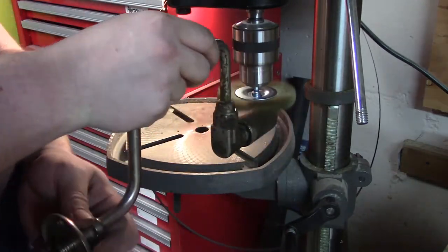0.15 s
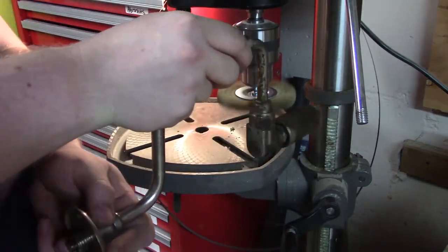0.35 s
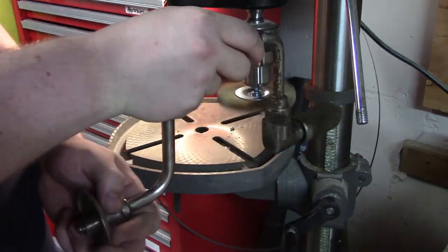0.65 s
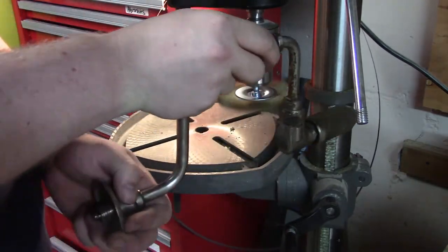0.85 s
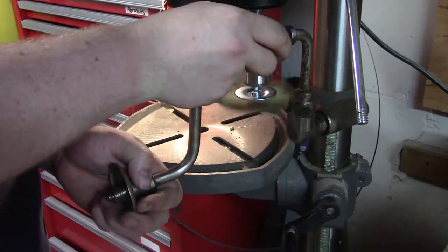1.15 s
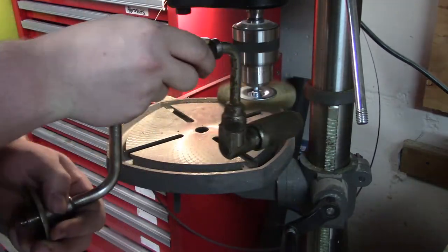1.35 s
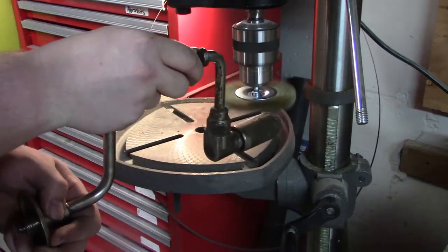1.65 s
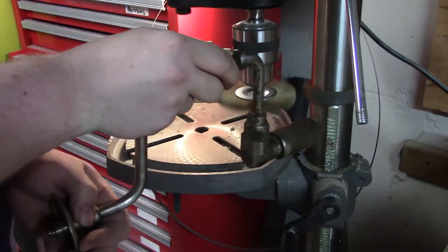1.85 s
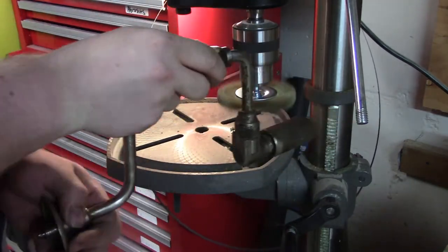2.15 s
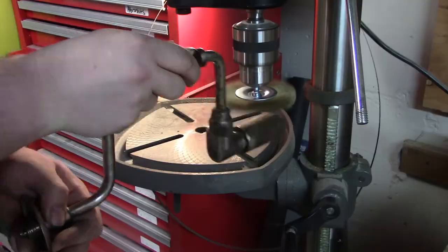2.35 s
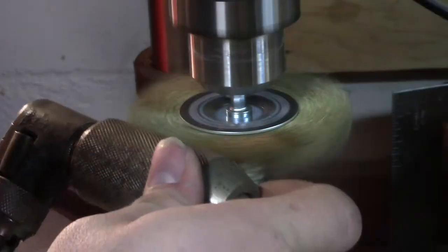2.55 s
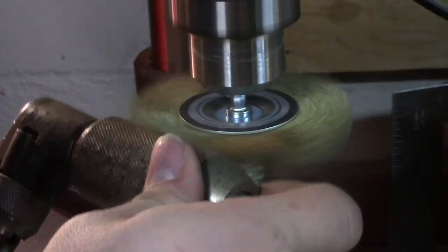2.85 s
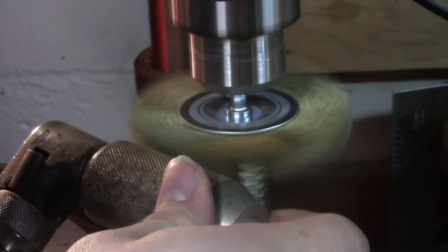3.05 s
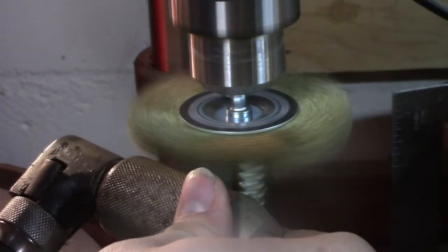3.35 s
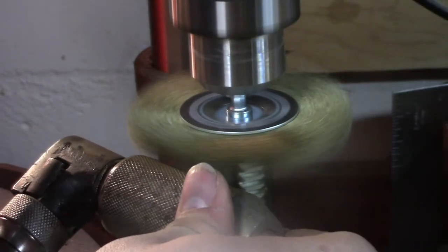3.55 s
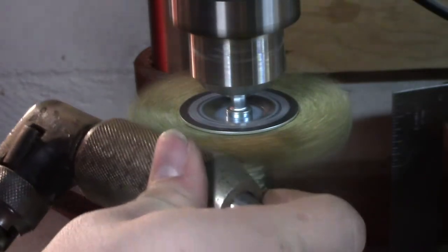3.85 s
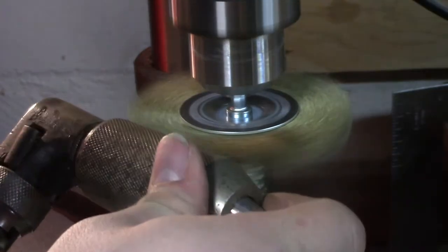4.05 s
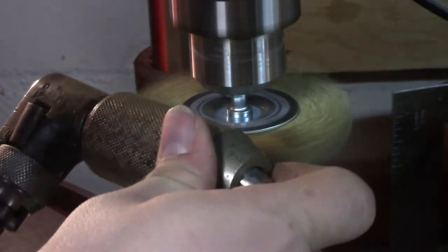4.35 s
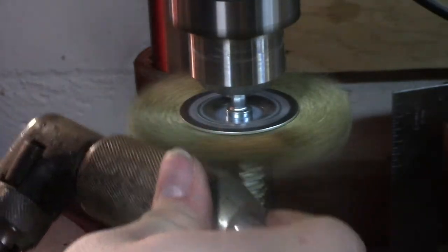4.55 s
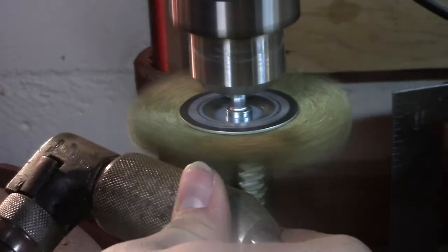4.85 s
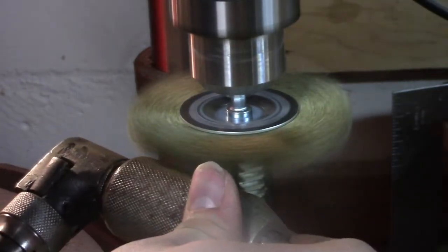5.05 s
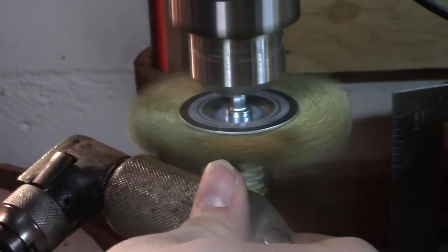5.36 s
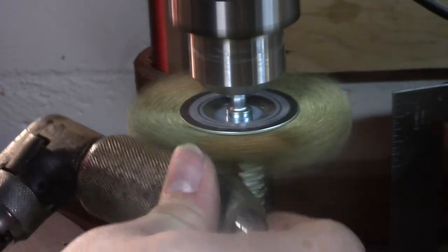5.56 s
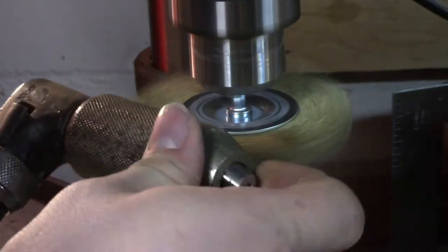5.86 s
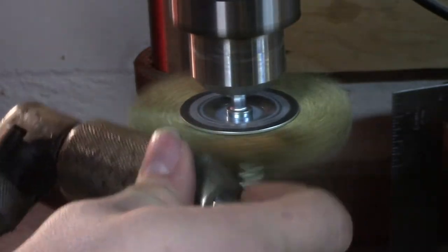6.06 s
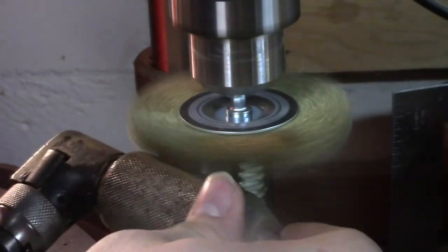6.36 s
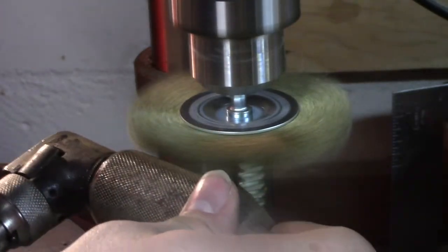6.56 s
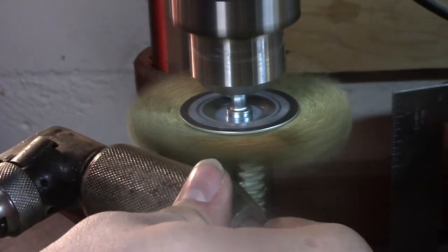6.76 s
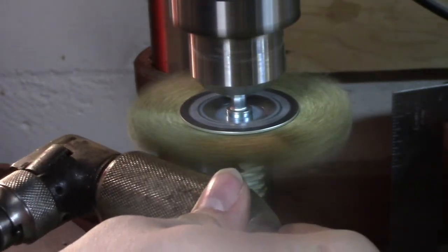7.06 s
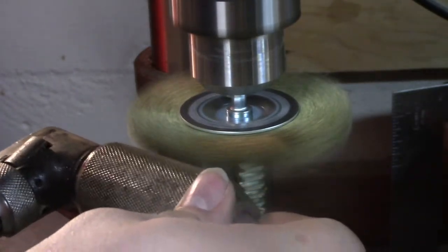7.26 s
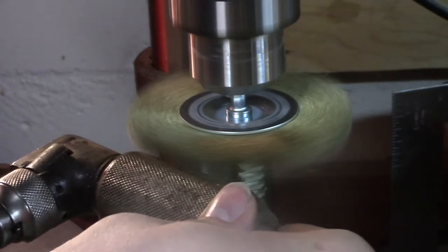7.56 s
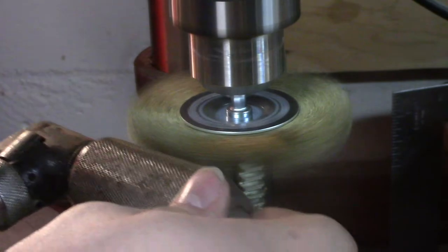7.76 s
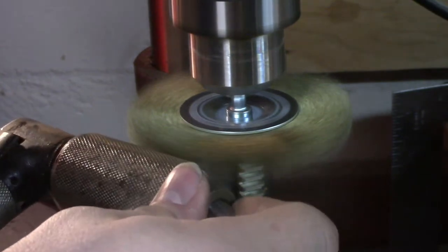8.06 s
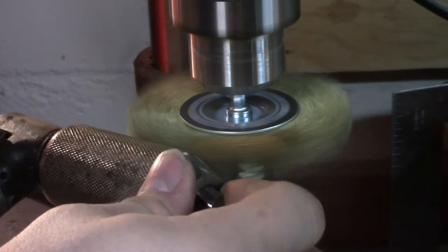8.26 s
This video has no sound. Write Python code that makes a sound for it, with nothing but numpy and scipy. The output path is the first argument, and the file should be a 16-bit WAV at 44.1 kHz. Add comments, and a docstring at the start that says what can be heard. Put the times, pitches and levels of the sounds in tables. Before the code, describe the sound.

A spinning brush wheel on a drill press scrubs a steel tool, first as a fast buzzing rasp, then a closer, slower, knocking chatter.

```python
"""In a workshop, a steel tool is pressed against a brush wheel spinning in a drill press.
The motor and belt rumble and hum. The bristles chatter on the tool once a turn, catch on its edges
and hiss as they slide off. First we hear it from farther away and sped up, so pitch and rhythm
are raised. Then we jump close by, at true speed: the tool also knocks, and at last faintly squeals."""
import sys
import numpy as np
from scipy import signal
from scipy.fft import rfft, irfft, next_fast_len
from scipy.io import wavfile
from scipy.ndimage import map_coordinates

SR = 44100
rng = np.random.default_rng(int(sys.argv[2]) if len(sys.argv) > 2 else 0)


def transcribe(u):
    """Save the signal u as a 16-bit wav file named by the first command-line argument.

    u: samples, shape (n,) or (channels, n), limited to [-1, 1]; the rate is SR.
    q: integer samples, one column per channel.
    """
    v = np.clip(np.atleast_2d(u).T, -1, 1)
    q = np.round(v * 32767).astype(np.int16)
    wavfile.write(sys.argv[1], SR, q)


N = 370440
T = np.arange(N) / SR

CUT_S, FAST = 2.506, 4.822  # when the close scene begins; how many times faster the far one runs
SPINDLE_HZ = 31.965  # turns of the wheel a second, at true speed

# The tone colour far off and close by. Each row: frequency at true speed in Hz, boost in dB.
FAR_COLOUR = [(30, -15), (100, -4.5), (150, -2), (450, -6.5), (1000, 0), (1400, -0.5), (1700, 0.5),
              (2300, -3.5), (3200, -6.5)]
CLOSE_COLOUR = [(30, -0.77), (340, -1.2), (550, -0.65), (850, -0.23), (1400, 0.22), (1530, -0.49),
                (2000, -0.42), (5000, -0.049), (15800, -0.65)]
# Notes at which press, table and tool ring close by. Each row: pitch in Hz, width in Hz, boost in dB.
CLOSE_RINGS = [(151.6, 9, 11), (175, 14, 1.5), (226, 19, 6), (342, 18, -4), (391, 30, 10.5),
               (444, 39, 13.5), (501, 18, 2), (548, 20, -1.5), (613, 59, 3.5), (662, 19, 5.5), (695, 27, 3),
               (790, 28, 2.5), (830, 14, -3), (907.5, 33, 12), (950, 18, -1.5), (1002, 47, 11),
               (1120, 32, 5), (1310, 40, 3), (1450, 40, 8.5), (1520, 50, -3), (1610, 43, 3.5),
               (1775, 32, 3.5), (2220, 140, -2.5), (2402, 68, 7), (2535, 56, 7.5), (2850, 200, 3.5),
               (3090, 90, -4.5), (3200, 51, 4.2), (3606, 110, 7.5), (3830, 180, 8), (4003, 33, 6),
               (4200, 120, -2), (4361, 220, 3), (4760, 280, 3.5), (5230, 250, -2)]


def amp(db):
    """Turn decibels into a factor to multiply by."""
    return 10 ** (np.asarray(db) / 20)


def unit(x):
    """Scale x to an average (rms) level of 1."""
    return x / np.sqrt(np.mean(x ** 2) + 1e-20)


def along(points, hz):
    """Read a curve of (Hz, value) points at hz, with octaves evenly spaced."""
    frequencies, values = np.transpose(points)
    return np.interp(np.log(hz + 1), np.log(frequencies + 1), values)


def wobble(rate):
    """A smooth random curve that heads for a new value rate times a second."""
    return map_coordinates(rng.standard_normal(N // 8), [T * rate], mode="wrap")


def coloured(x, gain_db):
    """Shape the tone of x by a curve of dB against frequency; white noise would keep its level."""
    size = 16384
    cepstrum = irfft(np.log(amp(gain_db(np.fft.rfftfreq(size, 1 / SR))) + 1e-7))
    cepstrum[1:size // 2] *= 2  # folded so that the filter rings only after a sound, never before
    cepstrum[size // 2 + 1:] = 0
    kernel = irfft(np.exp(rfft(cepstrum)))
    return signal.fftconvolve(x, kernel / np.linalg.norm(kernel))[:N]


def through_press(force, spectrum, speed, detune=0):
    """A force makes machine and tool ring; detune shifts the tool's own notes, those above 2200 Hz."""
    # Sped up, with the tool held upright, everything rings higher.
    # Each row: pitch as heard in Hz, width in Hz, boost in dB.
    far_rings = [(732, 48, 10.5), (990, 41, 5), (1224, 93, 3), (1394, 14, 4), (1640, 50, -3),
                 (1800, 164, 6), (1973, 180, 6.5), (2170, 114, 10), (2440, 85, 7), (2890, 45, 7),
                 (3177, 140, 9), (3446, 124, 8.5), (3697, 88, -2), (4190, 70, 2), (4300, 60, -4),
                 (4410, 114, 12.5), (4530, 170, 4.5), (4750, 90, 5), (4910, 140, 4.5), (5090, 120, 7.5),
                 (5190, 70, 2), (5460, 69, 8), (5795, 420, -4), (6800, 160, 6.5), (8000, 100, -7),
                 (8800, 440, 4.5), (9420, 260, 6.5), (12000, 700, 4.5), (15100, 500, 5)]
    rings, colour = (CLOSE_RINGS, CLOSE_COLOUR) if speed == 1 else (far_rings, FAR_COLOUR)
    rings = [(hz * (1 + detune * (hz > 2200)), width, db) for hz, width, db in rings]
    boost = lambda f: sum(db / (1 + (2 * (f - hz) / width) ** 2) for hz, width, db in rings)
    return coloured(force, lambda f: along(spectrum, f / speed) + along(colour, f / speed) + boost(f))


def strikes(rate, spread_db):
    """Countless tiny hits blur into noise, in uneven bunches that come rate times a second."""
    return unit(rng.standard_normal(N) * amp(spread_db * wobble(rate)))


def drive(speed):
    """Belt and bearings shake the frame in uneven lumps; motor and pulleys hum almost steadily."""
    # The tone of the rumble. Each row: frequency at true speed in Hz, level in dB.
    spectrum = [(30, -26.5), (100, -26), (130, -19), (165, -9), (260, 0.5), (350, -8.5), (500, -9),
                (800, -23), (1500, -40.5)]
    # The humming notes. Each row: pitch at true speed in Hz, level close by in dB, level far off in dB.
    notes = [(86.6, -34, -30), (120.4, -28, -20.5), (128.8, -35, -25.5), (151.8, -14.5, -10),
             (159.4, -37, -17.5), (177, -22, -24), (225, -17.5, -24), (253.5, -25, -11)]
    lumps = unit(amp(1.6 * wobble(40 * speed)))
    rumble = through_press(strikes(90 * speed, spread_db=0.5) * lumps, spectrum, speed)
    hum = np.zeros(N)
    for hz, close_db, far_db in notes:
        db = close_db + along(CLOSE_COLOUR, hz) if speed == 1 else far_db + along(FAR_COLOUR, hz)
        hum += amp(db) * np.sin(2 * np.pi * hz * speed * T + 0.5 * wobble(5))
    return rumble + hum


def held(start, end, speed):
    """One press of the hand, from 0 to 1 and back: lean in, hold, ease off."""
    ramp_s = 0.13 / speed
    lean = np.clip(.5 + (T - start) / ramp_s, 0, 1)
    ease = np.clip(.5 + (end - T) / ramp_s, 0, 1)
    return lean * ease


def handwork(presses, graze, speed):
    """Turn the presses into smooth curves; between presses the bristles only graze the tool."""
    table = np.array(presses)
    holds = np.array([held(start, end, speed) for start, end in table[:, :2]])
    rest = np.array(graze)[:, None]
    return rest + (table[:, 2:].T - rest) @ holds / np.maximum(holds.sum(axis=0), 1)


def wheel_grip(turn_shape, speed, start_turn):
    """The off-centre wheel grips and eases once a turn; the hand gives way, so each turn differs."""
    part, db = np.transpose(turn_shape)
    turns = SPINDLE_HZ * speed * T + start_turn + .06 * wobble(SPINDLE_HZ * speed / 2)
    bite_db = 1.7 * np.clip(rng.standard_normal(N // 20), -2, 2)[turns.astype(int)]
    return unit(amp(np.interp(turns, part, db, period=1) + bite_db * np.sin(np.pi * (turns % 1))))


def chug(speed):
    """The grip surges as the belt's joint comes round and the tool rocks in the hand."""
    # Each row, at true speed: surges a second, time of one surge in seconds, swing in dB.
    surges = [(9.95, .026, .95), (11.64, .038, .55)]
    return unit(amp(sum(db * np.cos(2 * np.pi * hz * (speed * T - s)) for hz, s, db in surges)))


def chatter(force, speed, detune=0):
    """Bristles beat on the steel and set tool and press ringing."""
    # The tone of the beating. Each row: frequency at true speed in Hz, level in dB.
    spectrum = [(250, -33.5), (620, 0), (1000, -4), (1400, -7.5), (1520, -13), (2500, -14), (3700, -11),
                (5300, -21.5), (9000, -25), (15800, -38)]
    return through_press(force, spectrum, speed, detune)


def sizzle(grip):
    """The sped-up hiss flickers as fine bristles touch and leave the moving tool."""
    # Each row: frequency in Hz, level in dB.
    spectrum = [(4500, -30), (6900, 0), (7700, 2), (8150, -5), (8500, 3), (9400, 5), (10600, -4),
                (11400, 2), (12600, 3), (13800, -3), (15000, -1), (15800, -5)]
    flicker = unit(amp(2.1 * wobble(42)))
    return coloured(strikes(1400, spread_db=3.0) * grip ** 0.16 * flicker, lambda f: along(spectrum, f))


def workshop(x, speed, fade_s, echo_db):
    """Nearby walls and cabinets add a short echo that falls 60 dB in fade_s at true speed."""
    t = T[:SR // 2]
    tail = rng.standard_normal(len(t)) * amp(-60 * t * speed / fade_s) * (t * speed > .004)
    return x + amp(echo_db) * signal.fftconvolve(x, tail / np.linalg.norm(tail))[:N]


def catches(rows, speed, rise_s, decay_s):
    """A tuft snags on an edge of the tool, tightens quickly and rakes over it in a short burst."""
    # The tone of the raking. Each row: frequency at true speed in Hz, level in dB.
    spectrum = [(200, -38), (600, 0.5), (1000, 5.5), (1400, -0.5), (1600, -2.5), (2600, -5), (3800, -7),
                (5500, -15), (9000, -18), (15800, -29)]
    age = np.maximum(T[:SR // 5] - rise_s / 2, 0)
    burst = (1 - np.exp(-age / rise_s)) * np.exp(-age / decay_s)
    force = np.zeros(N)
    for s, db in rows:
        first = max(round((s - rise_s) * SR), 0)
        force[first:first + len(burst)] += amp(db) * burst[:N - first]
    return through_press(force * rng.standard_normal(N), spectrum, speed)


def far_brushing():
    """Sped up, the turns merge into a buzz and the chatter becomes a bright rasp."""
    # The hand leans in. Each row: start and end in seconds, chatter level in dB, hiss level in dB.
    presses = [(0.14, 0.33, -36.5, -50), (0.33, 0.38, -37.5, -44), (0.38, 0.71, -37, -50),
               (0.71, 0.87, -36, -46), (0.87, 1.05, -35.8, -50), (1.07, 1.47, -35.5, -48),
               (1.48, 1.78, -36.5, -48), (1.78, 1.86, -35.5, -43), (1.86, 1.97, -37.8, -48.5),
               (1.97, 2.04, -34.5, -50), (2.05, 2.23, -36.5, -49), (2.23, 2.41, -36, -43)]
    # One turn of the wheel. Each row: place in the turn from 0 to 1, grip in dB.
    turn_shape = [(0, -6.5), (.13, 0), (.23, 5.5), (.42, 1.5), (.7, -3), (.9, -5.5)]
    # Tufts that catch. Each row: time in seconds, relative strength in dB.
    tufts = [(0.193, -21), (0.3462, -17.5), (0.7877, -20), (0.8326, -19), (1.098, -20), (1.281, -21),
             (1.728, -16), (1.8058, -19), (1.834, -21.5), (2.001, -19), (2.232, -22), (2.252, -17),
             (2.376, -21), (2.4035, -17.5)]
    graze_db = -38.5
    chatter_db, hiss_db = handwork(presses, (graze_db, -54.5), FAST)
    grip = wheel_grip(turn_shape, FAST, start_turn=0.57)
    rasp = chatter(strikes(1500, spread_db=1.5) * grip * chug(FAST) ** 0.8 * amp(chatter_db), FAST)
    snags = amp(-7.5) * catches(tufts, FAST, rise_s=.002, decay_s=0.0086)
    rub = workshop(rasp + snags + amp(hiss_db) * sizzle(grip), FAST, fade_s=0.32, echo_db=-9)
    shake_db = -41.9 + 0.39 * (chatter_db - graze_db)  # pressing harder shakes the machine more
    return rub + amp(shake_db) * drive(FAST)


def bristle_hiss(sliding, hiss_db, on_tip):
    """Sliding bristles hiss one way on the tool's side, another on its tip, and sing a thin note."""
    # The hiss on the side and on the tip. Each row: frequency in Hz, level in dB.
    side_spectrum = [(2000, -24.5), (3800, -4), (5400, -13.5), (6300, -4.5), (6800, -5.5), (7300, -0.5),
                     (8050, 1), (8400, -6), (9100, 0.5), (9800, -2.5), (11100, -11), (12500, -11),
                     (13400, -15), (15800, -31)]
    tip_spectrum = [(2500, -9), (3300, -3.5), (4200, -12), (5500, -15), (6600, 1.5), (6900, -5.5),
                    (7750, 0.5), (8700, -6.5), (9900, -4.5), (11100, -14), (12400, -9), (13200, -18),
                    (15800, -27)]
    side = coloured(strikes(900, spread_db=1.0) * sliding, lambda f: along(side_spectrum, f))
    tip = coloured(strikes(500, spread_db=2.0) * sliding, lambda f: along(tip_spectrum, f))
    thin_note = lambda f: -20 * np.log10(1 + ((f - 11820) / 170) ** 2)
    song = sliding * coloured(rng.standard_normal(N), thin_note)
    side += amp(-21 + (T - CUT_S)) * song  # grows 1 dB a second as the metal comes clean
    squeal = amp(-64) * held(start=7.80, end=8.5, speed=1) * song
    return amp(hiss_db) * (np.sqrt(1 - on_tip) * side + np.sqrt(on_tip) * tip) + squeal


def knocks(push_db):
    """On most turns the tool bounces on the wheel's high side; each dull knock rings a bit differently."""
    # The hardest bounces. Each row: start in seconds, level in dB.
    hard = [(2.72, -25), (3.126, -28), (3.414, -34), (3.6, -30), (3.693, -31), (3.847, -30), (4.538, -25),
            (5.003, -27), (5.097, -31), (5.187, -28), (5.535, -30), (6.475, -28), (6.571, -35),
            (6.628, -27), (6.718, -23), (7.229, -28.5), (7.594, -25), (7.944, -28), (8.138, -27)]
    # The tone of a knock. Each row: frequency in Hz, level in dB.
    spectrum = [(150, -34), (450, -22), (650, -7.5), (910, -1), (1000, 1.5), (1450, -11), (2500, -23),
                (3700, -9.5), (4800, -14)]
    share_of_turns, rise_s, damping = .88, .0025, 1.8  # the soft bristles cut the ringing short
    turns = np.arange(int(CUT_S * SPINDLE_HZ), int(T[-1] * SPINDLE_HZ))
    late, strength = np.clip(rng.standard_normal((len(turns), 2)), -2, 2).T
    times = (turns + .76 + .09 * late) / SPINDLE_HZ
    levels = np.interp(times, T, push_db) + 7.2 + 1.9 * strength
    light = np.column_stack([times, levels])[rng.random(len(turns)) < share_of_turns]
    hz, width, boost = np.array([ring for ring in CLOSE_RINGS if ring[2] > 0]).T
    t = T[:SR // 10]
    rings = np.exp(np.outer(2j * np.pi * hz - np.pi * width * damping, t)) * (1 - np.exp(-t / rise_s))
    out = np.zeros(N + SR)
    for s, db in [*hard, *light]:
        gains = amp(boost + along(spectrum, hz) + 2 * rng.standard_normal(len(hz)))
        mix = gains * np.exp(2j * np.pi * rng.random(len(hz)))  # each note starts at a random phase
        out[round(s * SR):][:len(t)] += amp(db) * (mix / np.linalg.norm(mix) @ rings).imag
    return out[:N]


def digs():
    """The tool briefly digs into the wheel (more dB) or skips off it (fewer dB)."""
    # Each row: middle in seconds, length in seconds, change of the chatter in dB.
    moments = [(2.98, 0.058, -5), (3.27, 0.034, -7), (3.30, 0.057, -1), (3.39, 0.068, -6), (3.71, .08, 4),
               (3.802, 0.036, -8), (5.555, .09, 5), (5.656, 0.068, 3), (5.757, .14, 2), (6.39, 0.025, 1),
               (6.54, 0.056, -4), (6.796, 0.035, -4), (6.934, 0.069, -3.5), (7.242, .09, 3),
               (7.298, 0.039, -1), (7.529, .05, -3), (7.66, .06, 1), (7.74, .05, 2), (7.995, 0.027, -7),
               (8.123, 0.04, -3), (8.213, 0.1, 1), (8.303, 0.062, -9)]
    return sum(db * np.cos(np.pi * np.clip((T - s) / length, -.5, .5)) ** 2 for s, length, db in moments)


def close_brushing():
    """At true speed the tool chatters, knocks and chugs, while the bristles hiss more evenly."""
    # The hand leans in. Each row: start and end in seconds, chatter level in dB, hiss level in dB,
    # and the part of the tool that touches, from 0 (side) to 1 (tip).
    presses = [(2.71, 2.85, -42.5, -53, .4), (2.85, 3.02, -43, -56, 0.15), (3.02, 3.78, -41.5, -49, 0),
               (3.78, 4.08, -39, -50, 0.9), (4.10, 4.54, -40.5, -48, 1), (4.58, 5.08, -40, -48, 0.12),
               (5.08, 5.58, -42, -47, 0), (5.61, 5.94, -41, -48.5, 0.97), (5.94, 6.12, -39, -46.5, 0.91),
               (6.28, 6.63, -39.5, -46.4, 0), (6.63, 6.92, -37.3, -46.3, 0.044),
               (6.92, 7.55, -40, -46.7, 0.08), (7.55, 8.04, -38.5, -46.5, .1),
               (8.07, 8.5, -39.5, -50.3, 0.71)]
    # One turn of the wheel. Each row: place in the turn from 0 to 1, grip in dB.
    turn_shape = [(0, -5.5), (.14, 1.8), (.42, 1.5), (.78, -0.3), (.92, -3.2)]
    # Tufts that catch. Each row: time in seconds, relative strength in dB.
    tufts = [(3.285, -24.5), (4.062, -24), (4.249, -24.5), (4.337, -22), (4.431, -16), (5.255, -25),
             (5.636, -23.5), (6.03, -20.5), (6.404, -16), (6.657, -21), (6.749, -19.5), (6.839, -16),
             (7.064, -24.5), (7.156, -27), (7.341, -16), (7.727, -23), (8.01, -18), (8.347, -21)]
    graze_db = -45.5
    chatter_db, hiss_db, on_tip = handwork(presses, (graze_db, -60.5, .5), speed=1)
    chatter_db = chatter_db + digs()
    grip = wheel_grip(turn_shape, speed=1, start_turn=0.42)
    force = strikes(320, spread_db=0.7) * grip * chug(0.99) * amp(chatter_db - 1.14)
    lower, higher = (chatter(force, speed=1, detune=shift) for shift in (-.006, .006))
    place = .5 + .5 * np.tanh(wobble(5))  # the touching point wanders and shifts the tool's notes
    scrub = (1 - place) * lower + place * higher
    snags = amp(-10.8) * catches(tufts, speed=1, rise_s=0.0011, decay_s=0.012)
    sliding = unit(grip ** 0.58 * amp(0.77 * wobble(60)))
    bounces = knocks(chatter_db + 20 * np.log10(chug(0.97)))
    hiss = bristle_hiss(sliding, hiss_db, np.clip(on_tip, 0, 1))
    rub = workshop(scrub + snags + bounces + hiss, speed=0.87, fade_s=0.34, echo_db=-10.5)
    # The tip digs in and shakes the machine more than the side does; the rumble also slowly grows.
    shake_db = -47.5 + 0.39 * (chatter_db - graze_db) + 1.1 * on_tip + 0.43 * (T - CUT_S)
    return rub + amp(shake_db) * drive(speed=1)


def scene():
    """The far scene jumps straight to the close one; left and right differ only very faintly."""
    close = np.clip(.5 + (T - CUT_S) / .012, 0, 1)
    mono = np.sqrt(1 - close) * far_brushing() + np.sqrt(close) * close_brushing()
    t = T[:SR // 20]
    scatter = rng.standard_normal(len(t)) * amp(-60 * t / 0.017)
    spread = amp(-37.5) * signal.fftconvolve(mono, scatter / np.linalg.norm(scatter))[:N]
    return np.array([mono + spread, mono - spread])


def record(dry):
    """Remove the very highest treble."""
    top_hz = 15820
    size = next_fast_len(N + SR // 2)
    return irfft(rfft(dry, size) * (np.fft.rfftfreq(size, 1 / SR) < top_hz), size)[:, :N]


dry = scene()
out = record(dry)
transcribe(out)
```